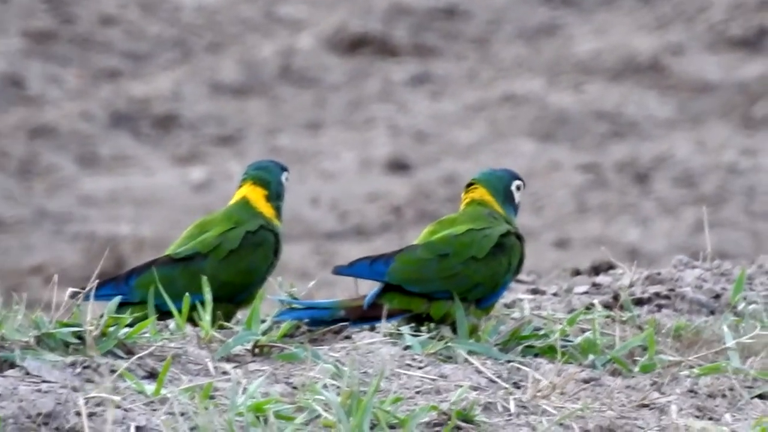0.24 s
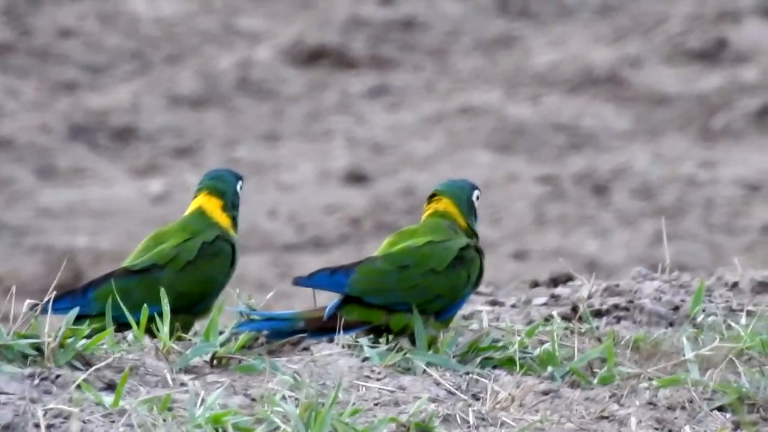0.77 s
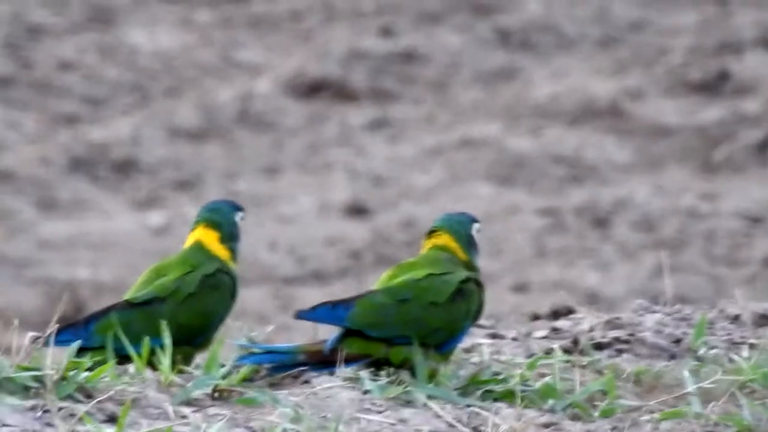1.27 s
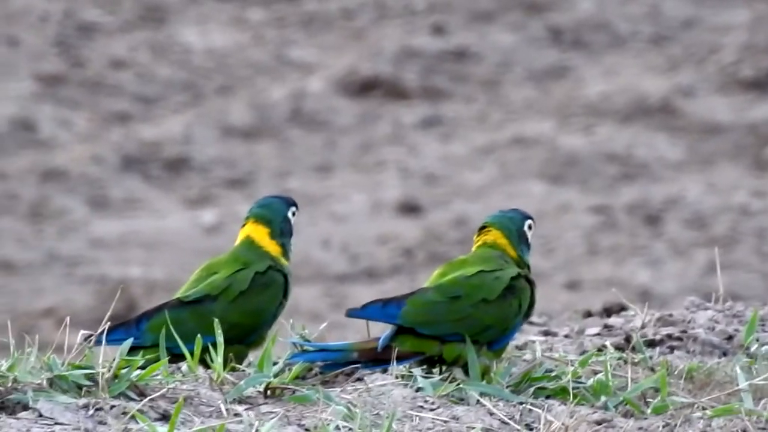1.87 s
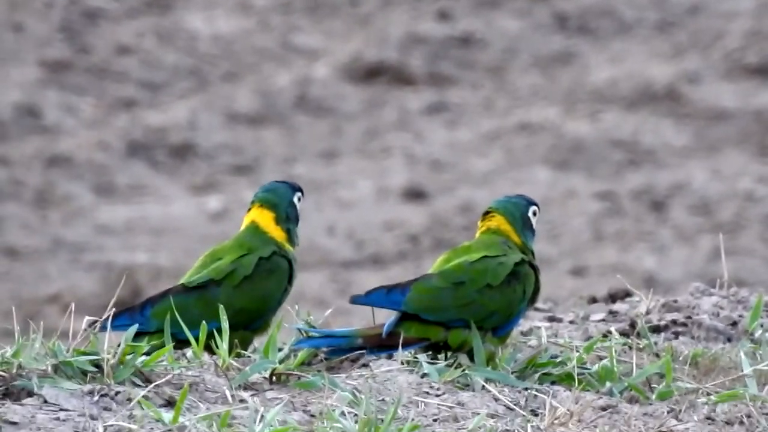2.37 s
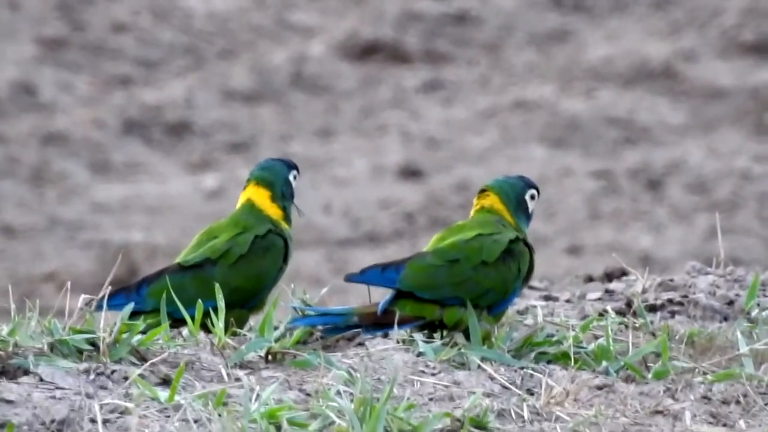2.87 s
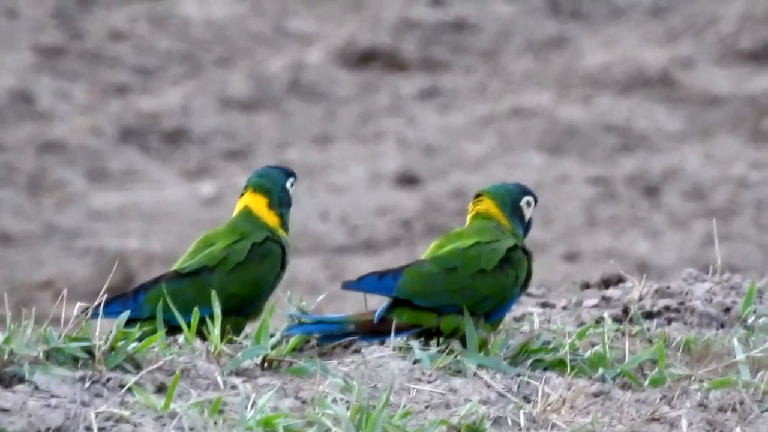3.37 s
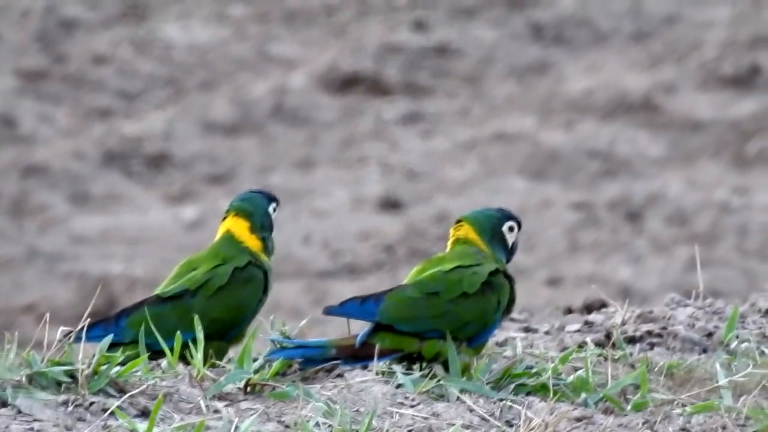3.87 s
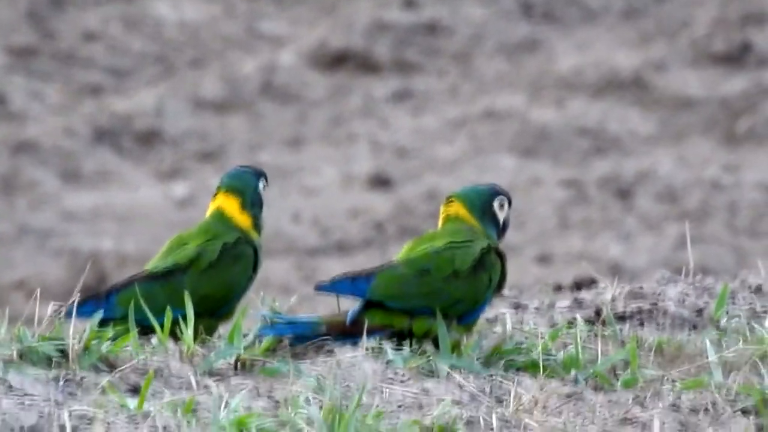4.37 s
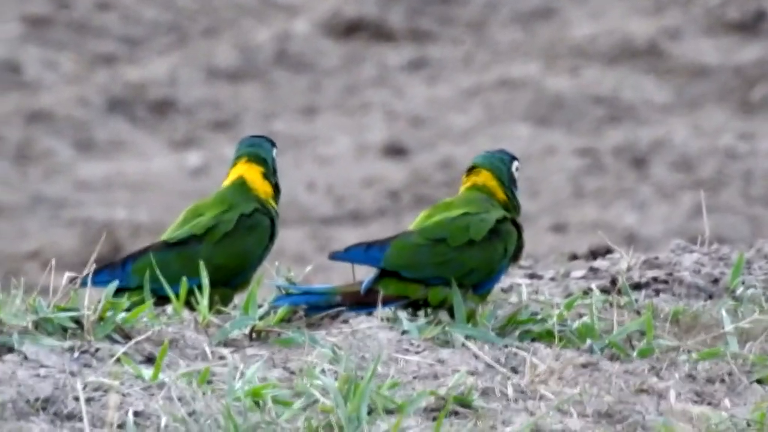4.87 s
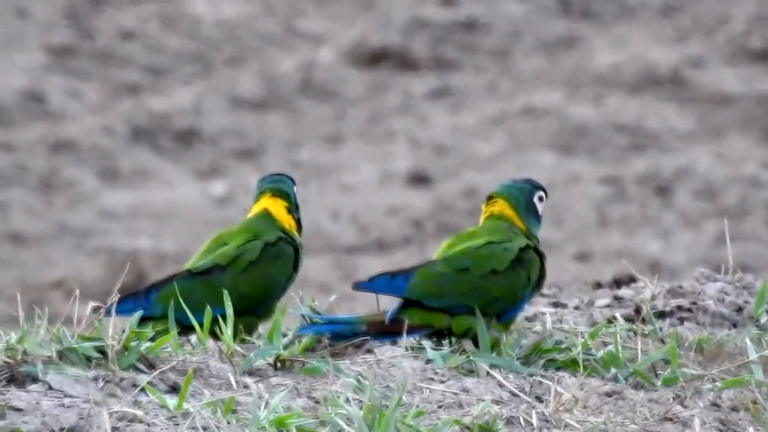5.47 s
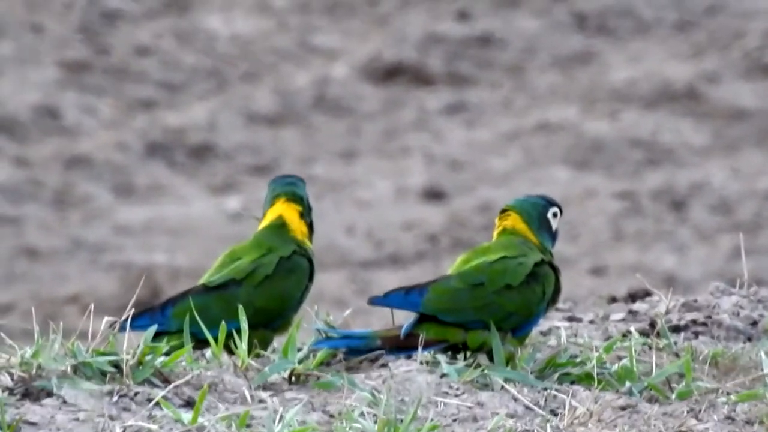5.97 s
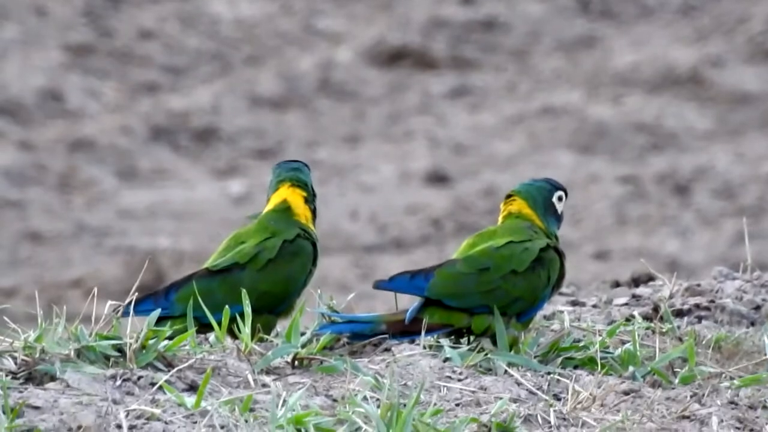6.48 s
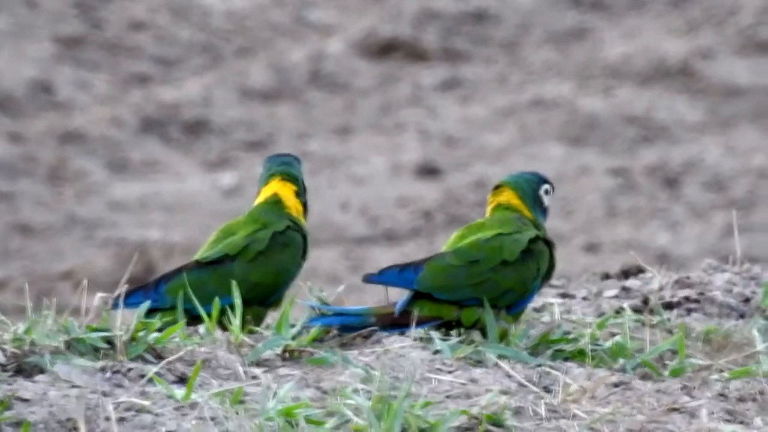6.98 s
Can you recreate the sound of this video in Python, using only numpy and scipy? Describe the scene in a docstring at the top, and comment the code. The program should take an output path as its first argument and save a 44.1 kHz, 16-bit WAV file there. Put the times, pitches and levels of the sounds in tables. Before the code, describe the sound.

Quiet open ground with soft air noise and faint distant birds. A few dull knocks close by, then a parrot's low buzzing growl. A dry clattering burst of knocks leads into six harsh, fluttering screeches, four in quick succession and two more spaced apart, with a short grunt among them. Trees return a light echo. Soft low hoots close the scene. One mono microphone outdoors.

```python
"""Macaws call outdoors: a low growl, then six harsh, arching screeches with a short grunt among them.
Each call is a buzzing syrinx (the bird's voice organ) with a fast flutter, heard through throat and beak.
Trees and ground return the calls as a few echoes and a fading wash of scattered sound.
Close knocks are short bursts of shaped noise, and rustles are grainy noise that swells and fades.
Far birds, soft hoots, hums and bumps are swelling tones in a hush of shaped noise with a thin insect tone."""
import sys
import numpy as np
from scipy import signal
from scipy.fft import rfft, irfft, next_fast_len
from scipy.io import wavfile
from scipy.ndimage import uniform_filter1d, minimum_filter1d

SR = 44100
rng = np.random.default_rng(int(sys.argv[2]) if len(sys.argv) > 2 else 0)


def unload_audio(sound):
    """Save the sound as a 16-bit wav file, at the path given as the first command line argument."""
    columns = np.transpose(np.atleast_2d(sound))
    # keep every value between -1 and 1, then stretch to whole-number steps
    steps = np.round(np.clip(columns, -1, 1) * 32767)
    wavfile.write(sys.argv[1], SR, steps.astype(np.int16))


N = 319284
TIME = np.arange(N) / SR
CUTOFF_HZ = 15100   # top of the voices and of the final sound

# colour of knocks and rustles: (frequency [Hz], level [dB])
KNOCK_COLOUR = [(59, -49), (100, -18.5), (254, -5.5), (643, -9.5), (1170, -8.5), (1920, -12), (2270, -12),
                (3090, -17.5), (5870, -22.5), (14000, -49)]


def from_db(db):
    """Turn decibels into a gain."""
    return 10 ** (np.asarray(db) / 20)


def rms_one(x):
    """Scale a sound to an average (rms) level of 1."""
    return x / np.sqrt(np.mean(x ** 2) + 1e-20)


def at_hz(points, hz):
    """Read a spectrum's level between its points, with frequency spaced in octaves."""
    point_hz, point_db = np.transpose(points)
    return np.interp(np.log(np.maximum(hz, 1)), np.log(point_hz), point_db)


def colour(x, spectrum, tilt_db=0):
    """Shape a sound by a spectrum and a slope in dB per octave; it fades below the lowest point."""
    size = next_fast_len(len(x), True)
    hz = np.maximum(np.fft.rfftfreq(size, 1 / SR), 1)
    gain = from_db(at_hz(spectrum, hz) + tilt_db * np.log2(hz / 2500))
    gain *= np.minimum(hz / spectrum[0][0], 1) ** 2
    return irfft(rfft(x, size) * gain, size)[:len(x)]


def wander(size, rate_hz):
    """Smooth random drift of rms 1: noise at a tenth of the sample rate, low-passed twice."""
    pole = np.exp(-2 * np.pi * rate_hz * 10 / SR)
    noise = rng.standard_normal(size // 10 + 402)
    slow = signal.lfilter([1], [1, -2 * pole, pole * pole], noise)
    slow = slow[400:]   # drop the filter's start-up
    return np.interp(np.arange(size) / 10, np.arange(len(slow)), rms_one(slow))


def add(out, s, sound):
    """Mix a sound in from time s, in seconds."""
    start = max(int(s * SR), 0)
    out[start:start + len(sound)] += sound[:N - start]


def background(insect_db, insect_hz):
    """Air noise with an unsteady level, a tone roughened into an insect band, and grainy rustling."""
    # outdoor hush: (frequency [Hz], relative level per Hz [dB])
    hush_colour = [(24, -69), (40, -16), (95, -15), (182, -6), (313, -3), (554, -7), (804, -9.5),
                   (1290, -13), (1420, -11), (2220, -15.5), (3070, -22.5), (4560, -27), (5990, -24.5),
                   (7130, -31.5), (15000, -37.5)]
    # spells of faint rustling: (middle [s], half length [s], level [dB])
    rustles = [(.1, 0.4, -67.5), (3.445, 0.15, -50), (4.296, 0.64, -56.5), (5.843, 0.63, -66.5),
               (6.944, 0.34, -58)]
    hush_db = -60.5
    breeze_db = 1.1 * wander(N, 16)
    hush = from_db(hush_db + breeze_db) * rms_one(colour(rng.standard_normal(N), hush_colour))
    insects = from_db(insect_db) * wander(N, 260) * np.sin(2 * np.pi * insect_hz * TIME)
    grains = rng.standard_normal(N) * from_db(1.84 * wander(N, 36))
    spells = sum(from_db(db) * np.exp(-((TIME - s) / half) ** 2) for s, half, db in rustles)
    return hush + insects + spells * rms_one(colour(grains, KNOCK_COLOUR))


def far_notes(rows, waver, waver_hz):
    """Pure tones that swell and fade, unsteady in pitch: (middle [s], length [s], pitch [Hz], level [dB])."""
    out = np.zeros(N)
    for middle, length, hz, db in rows:
        size = int(length * SR)
        pitch = hz * (1 + waver * wander(size, waver_hz))
        phase = 2 * np.pi * np.cumsum(pitch) / SR
        swell = np.sqrt(2) * np.hanning(size)
        add(out, middle - length / 2, from_db(db) * swell * np.sin(phase))
    return out


def low_notes():
    """Soft hoots and bumps as single low tones, and hums as a tone with its octave."""
    # soft hoots, all near one pitch: (middle [s], length [s], level [dB])
    hoot_rows = [(3.284, .12, -58), (3.527, 0.066, -54.5), (5.454, 0.12, -53.5), (6.832, 0.064, -62),
                 (6.959, 0.036, -53.5), (7.051, 0.0583, -46.5), (7.152, 0.061, -49.5), (7.233, 0.032, -51)]
    # faint low hums, level of the lower tone: (middle [s], length [s], level [dB])
    hum_rows = [(.205, .16, -61), (5.43, 0.24, -63.5)]
    # dull bumps: (middle [s], length [s], pitch [Hz], level [dB])
    bumps = [(0.621, 0.046, 103, -59), (4.297, .086, 80, -65.5)]
    hoot_hz, hum_hz, octave_db = 363.4, 167, -2
    hoots = [(s, length, hoot_hz, db) for s, length, db in hoot_rows]
    hums = [(s, length, hum_hz * 2 ** octave, db + octave_db * octave)
            for s, length, db in hum_rows for octave in (0, 1)]
    return far_notes(hoots + hums + bumps, waver=0.04, waver_hz=30)


def far_birds():
    """Faint far birds: short tones whose pitch wavers quickly."""
    # far birds: (middle [s], length [s], pitch [Hz], level [dB])
    bird_rows = [(.318, 0.026, 2900, -65), (.41, 0.24, 4150, -71.5), (.57, 0.31, 2020, -62.5),
                 (.665, 0.16, 2970, -67.5), (.97, 0.25, 2020, -67.5), (1.49, 0.13, 1880, -64),
                 (5.635, 0.041, 2500, -58.5)]
    return far_notes(bird_rows, waver=0.075, waver_hz=250)


def knocks():
    """Each knock is a sharp contact and a dry rattle: noise with a fast and a slower decay."""
    # knocks close by: (start [s], peak level [dB], treble setting [dB], rattle against contact [dB])
    knock_rows = [(0.228, -50, -24, 2), (0.356, -44, -15, 1), (1.27, -48, -6, -4), (2.375, -44, -24, 0),
                  (3.07, -49.5, -11, -8), (3.159, -51, 12, 2), (3.191, -36.5, -6.5, 5),
                  (3.202, -32.5, -9, 17), (3.218, -39.5, -3, 14), (3.272, -40.5, -5, 9),
                  (3.317, -35, -4, 7), (3.803, -39.5, -5, 3), (5.291, -39, -15, -7), (6.904, -53, -18, 0)]
    out, t = np.zeros(N), TIME[:SR // 5]
    for s, db, treble_db, rattle_db in knock_rows:
        # the treble setting is offset and stretched into the level at 4000 Hz
        shade = [(150, 0), (1200, 0), (4000, 1.4 * (treble_db + 6.0))]
        grit = rms_one(colour(colour(rng.standard_normal(len(t)), KNOCK_COLOUR), shade))
        contact = from_db(-60 * t / .022)
        rattle = from_db(rattle_db - 60 * t / .07)
        blow = grit * np.minimum(t / .001, 1) * (contact + rattle)
        add(out, s, from_db(db) * blow / np.abs(blow).max())
    return out


def field(x, scatter_db, t60):
    """Add a few distinct echoes and scatter from the trees that fades by 60 dB in t60 seconds."""
    # echoes off ground and trees: (delay [s], level [dB])
    echoes = [(.0023, -23), (.021, -16.5), (.041, -15.5)]
    # colour of the scattered sound: (frequency [Hz], level [dB])
    trees = [(300, -5), (900, -9.5), (2400, -0.5), (4700, 1), (5600, 3), (7500, -0.5), (12000, -1.5)]
    t = TIME[:SR + SR // 4]
    scatter = colour(rng.standard_normal(len(t)), trees)
    scatter = scatter * from_db(-60 * t / t60) * np.minimum(t / 0.014, 1)
    response = from_db(scatter_db) * scatter / np.sqrt(np.sum(scatter ** 2))
    for delay, db in echoes:
        add(response, delay, from_db([db]))
    return x + signal.fftconvolve(x, response)[:N]


def growl(length, top_hz, db, rough, bright_db):
    """One swell of effort builds, holds and lets go; pitch, level, brightness and beak follow it."""
    build_share, release_s = .68, 0.0281
    rest_hz, rest_db, rest_tilt_db = 482.5, -20.5, -11.5   # dB values are added at zero effort
    t = TIME[:int(length * SR)]
    effort = np.minimum(np.minimum(t / (build_share * length), (length - t) / release_s), 1)
    note = rest_hz + (top_hz - rest_hz) * effort
    level_db = db + rest_db * (1 - effort)
    tilt_db = bright_db + rest_tilt_db * (1 - effort) ** 2
    mouth_hz = np.interp(effort ** 2, [0, 1], [1290, 3450])   # beak resonance at rest, at full effort
    return note, level_db, rough, tilt_db, mouth_hz


def screech(length, attack, rise, curvature, top_hz, sag, breaks, break_s, break_ratio, rebound,
            clears, opens, db, swell_db, rough, bright_db):
    """Pitch arches up, sags, breaks lower, rebounds and falls; level, rasp and beak move with time."""
    start_hz, rebound_s = 589.5, 0.02616
    fall_s, fall_share = .038, .27
    onset_db, release_s, release_db = -24.5, 0.018, -8.5
    clear_roughness, clearing_s = 0.13, .05
    t = TIME[:int(length * SR)]
    left = length - t

    climb = (top_hz - start_hz) * np.maximum(1 - t / rise, 0) ** curvature
    arch = top_hz - climb - sag * np.maximum(t - rise, 0)
    register = np.interp(t - breaks, [0, break_s, break_s + rebound_s],
                         [1, break_ratio, break_ratio * (1 + rebound)])
    fall = 1 - fall_share * np.maximum(1 - left / fall_s, 0) ** 2
    note = arch * register * fall

    # the level opens quickly, keeps swelling and is cut short
    slack = np.maximum(1 - t / attack, 0) ** 2
    release = release_db * np.maximum(1 - left / release_s, 0)
    level_db = db + onset_db * slack - swell_db * left + release

    # the rasp clears, with a brief extra rasp as the voice breaks
    clearing = np.interp(t - clears, [-clearing_s / 2, clearing_s / 2], [rough, clear_roughness])
    roughness = clearing + 0.18 * np.exp(-((t - breaks - break_s / 2) / 0.018) ** 2)

    # the mouth rides one harmonic number in the rise, another atop the arch, a third once the beak opens
    settles = 0.654 * rise
    stage = sum(np.clip(.5 + (t - s) / 0.025, 0, 1) for s in (settles, opens))
    mouth_hz = arch * register * np.interp(stage, [0, 1, 2], [4.32, 1.92, 3.28])

    # dull by up to 6 dB per octave at the onset, and by 4 more for each octave under the top note
    tilt_db = bright_db - 6 * slack + 4 * np.log2(note / top_hz)
    return note, level_db, roughness, tilt_db, mouth_hz


def call(controls, throat, flutter_hz, unsteady, swing, throb_db, jitter):
    """The syrinx buzzes; when driven hard it flutters in pitch and level, jitters and rasps."""
    note, level_db, rough, bright_db, mouth_hz = controls
    size = len(note)
    beat = 2 * np.pi * np.cumsum(flutter_hz * (1 + unsteady * wander(size, 43.5))) / SR
    flutter = rough * (swing * np.sin(beat) + jitter * wander(size, 425))
    pitch = note * (1 + flutter + 0.00643 * wander(size, 83.0))
    phase = 2 * np.pi * np.cumsum(pitch) / SR
    # the throat shortens as the note rises, lifting its resonances
    lift = (note / 900) ** 0.41
    voice = np.zeros(size)
    half_lines = [1.5, 2.5, 3.5, 4.5]   # weak tones halfway between the harmonics
    for k in [*range(1, 21), *half_lines]:
        hz = k * pitch
        mouth_db = 6.1 / (1 + ((hz - mouth_hz) / 350) ** 2)
        shift = lift ** np.clip((6200 - hz) / 2500, 0, 1)   # the top resonance stays put
        throat_db = at_hz(throat, hz / shift)
        gain = from_db(throat_db + mouth_db + bright_db * np.log2(hz / 2500) + 2.7 * wander(size, 24.5))
        # no two cycles are alike: higher harmonics blur more
        blur = np.minimum((hz / 7500) ** 2, 2) * wander(size, 160)
        tone = np.sin(k * phase + blur + rng.uniform(0, 2 * np.pi))
        strength = 0.3 * rough if k % 1 else 1
        voice += gain * (hz < CUTOFF_HZ) * tone * strength
    voice /= np.sqrt(uniform_filter1d(voice ** 2, size=300) + 1e-12)   # even out the level
    # air escapes in a puff each cycle
    puffs = rng.standard_normal(size) * (1 + np.cos(phase))
    air = rms_one(colour(puffs, throat, tilt_db=1.5))
    rasp = .08 + .2 * rough
    throb = from_db(rough * (throb_db * np.sin(beat + 1.0) + 1.17 * wander(size, 170)))
    throb /= np.sqrt(uniform_filter1d(throb ** 2, size=1200))   # throb without a change in mean power
    return from_db(level_db) * throb * (voice + rasp * air)


def macaws():
    """Growls and harsh screeches from the same kind of voice, each through a throat shape."""
    # throat and beak shapes, all four: (frequency [Hz], level [dB])
    growl_throat = [(600, -19), (800, -3), (1100, -10), (1500, -2.5), (2000, -2), (2700, -1.5),
                    (3250, -4.5), (3650, -6), (4350, -6.5), (4750, -12), (5200, -25), (5900, -31.5),
                    (8300, -36.5), (11000, -70), (15000, -57)]
    open_throat = [(600, -12), (1000, -10), (1400, -8), (1900, 1), (2700, 0), (3500, 2), (4000, -13.5),
                   (4500, -5.5), (5400, -21.5), (5800, -16), (6250, -14.5), (6750, -20), (7600, -25.5),
                   (9000, -38), (15000, -56)]
    wide_throat = [(600, -17.5), (1000, -15.5), (1500, -10), (2000, -1.5), (2800, -3.5), (3500, 4),
                   (4100, -14.5), (4700, -4.5), (5500, -14), (6700, -12.5), (7300, -21.5), (8300, -22),
                   (9200, -35), (15000, -50)]
    narrow_throat = [(650, -19), (1000, -17.5), (1500, -10.5), (2000, -3.5), (2750, 1), (3300, -4.5),
                     (3850, -6.5), (4300, -18.5), (5600, -20.5), (6600, -19.5), (7800, -29), (10000, -43.5),
                     (15000, -59)]
    throats = {"growl": growl_throat, "open": open_throat, "wide": wide_throat, "narrow": narrow_throat}
    # the growl and the grunt: (start [s], length [s], top pitch [Hz], level [dB], roughness [0-1],
    #   brightness [dB per octave], flutter [Hz], throat [name])
    growl_rows = [(1.795, .33, 637, -38, 0.9, 5, 79.54, "growl"),
                  (4.15, 0.092, 512, -37, 0.6, 3.5, 84.5, "open")]
    # screeches: (start [s], length [s], attack [s], pitch rise [s], rise curvature [power], top pitch [Hz],
    #   sag [Hz per s], voice breaks after [s], break lasts [s], pitch of the break [ratio],
    #   rebound [share], rasp clears after [s], beak opens after [s], level at the end before release [dB],
    #   swell [dB per s], roughness [about 0-1], brightness [dB per octave], flutter [Hz],
    #   throb at roughness 1 [dB], throat [name])
    screech_rows = [(3.389, .312, 0.15, 0.22, .75, 797, 326, .205, 0.028, .8, 0.052, 0.255, 0.29, -31.5, 13, 1.01, 2.5, 83.24, 2.5, "open"),
                    (3.827, 0.28, 0.057, 0.093, 1.46, 923.5, 333, 0.18, 0.06, .82, 0.0508, .19, 0.16, -24, 23, 0.79, 2.5, 98.9, 1, "open"),
                    (4.259, 0.31, 0.032, 0.079, 1.68, 932.5, 376.5, .217, 0.0295, .86, 0.044, .165, 0.22, -24.5, 11, 0.78, 3, 84.36, 1, "open"),
                    (4.74, .362, 0.056, 0.13, 1.05, 924.4, 198.2, 0.27, .028, 0.86, 0.021, 0.27, 0.28, -24, 19, 0.78, 1.06, 83.37, 0, "open"),
                    (5.649, 0.32, 0.16, .15, .95, 960.5, 802, .24, .05, .9, 0.017, 0.293, 0.17, -28.5, 6, 0.66, -0.6, 83.44, 3, "wide"),
                    (6.183, 0.35, 0.15, .13, 1.0, 971.4, 513.7, .275, 0.0171, .88, 0.11, 0.18, 0.16, -28.5, 14.5, 0.63, 0.7, 85.5, 5, "narrow")]
    out = np.zeros(N)
    for s, *shape, flutter_hz, throat in growl_rows:
        add(out, s, call(growl(*shape), throats[throat], flutter_hz,
                         unsteady=.04, swing=.06, throb_db=5.5, jitter=.02))
    for s, *shape, flutter_hz, throb_db, throat in screech_rows:
        add(out, s, call(screech(*shape), throats[throat], flutter_hz,
                         unsteady=0.0794, swing=0.081, throb_db=throb_db, jitter=0.03))
    return out


def scene():
    """Everything reaches one microphone, the same in both channels."""
    birds = field(macaws(), scatter_db=-8.5, t60=0.67)
    far = low_notes() + far_birds()
    mono = birds + far + knocks() + background(insect_db=-89, insect_hz=6060)
    return np.array([mono, mono])


def record(dry):
    """A quick limiter holds down the loudest peaks; the top is cut steeply."""
    ceiling = .145
    needed = ceiling / np.maximum(np.abs(dry), ceiling)
    gain = uniform_filter1d(minimum_filter1d(needed, size=180), size=180)
    top_cut = signal.ellip(10, .1, 80, CUTOFF_HZ, fs=SR, output="sos")
    return signal.sosfilt(top_cut, dry * gain)


dry = scene()
out = record(dry)
unload_audio(out)
```